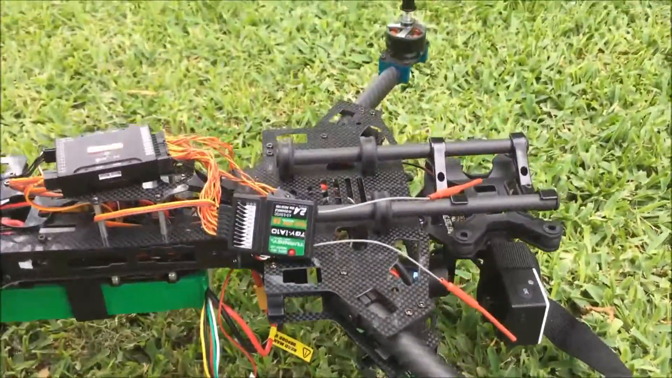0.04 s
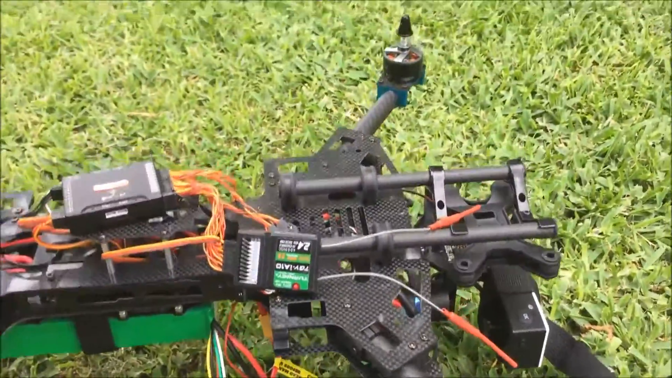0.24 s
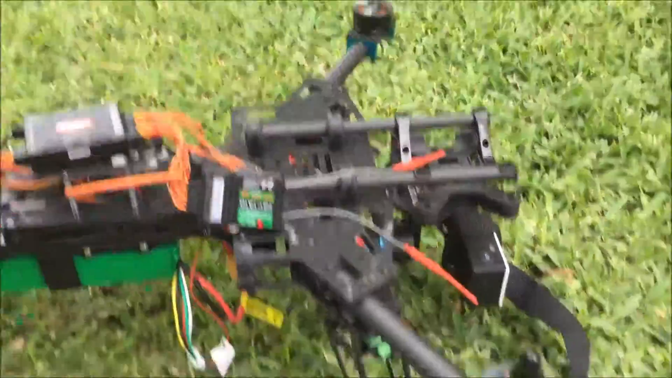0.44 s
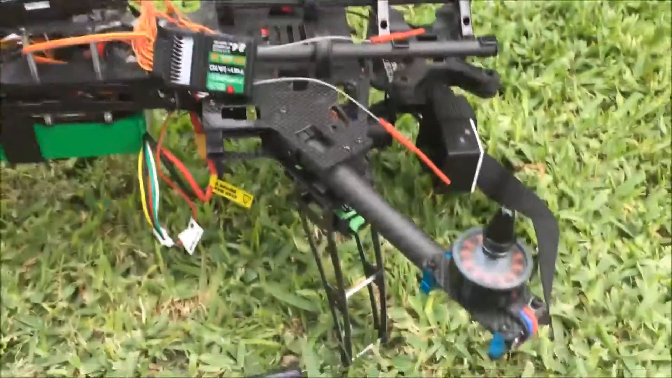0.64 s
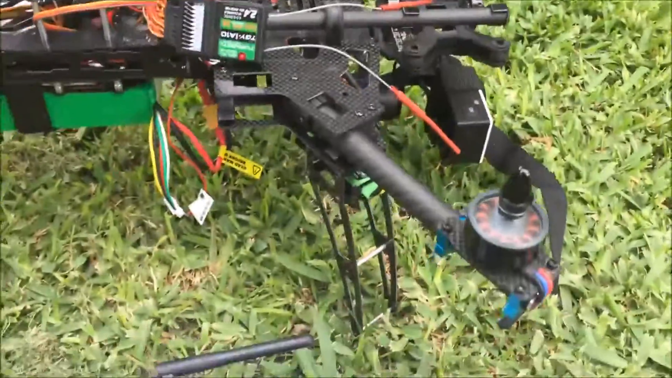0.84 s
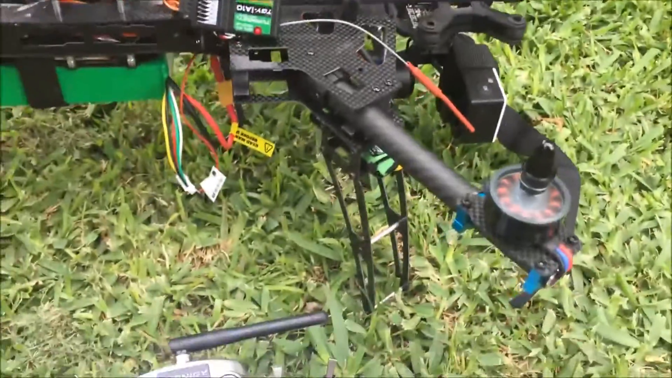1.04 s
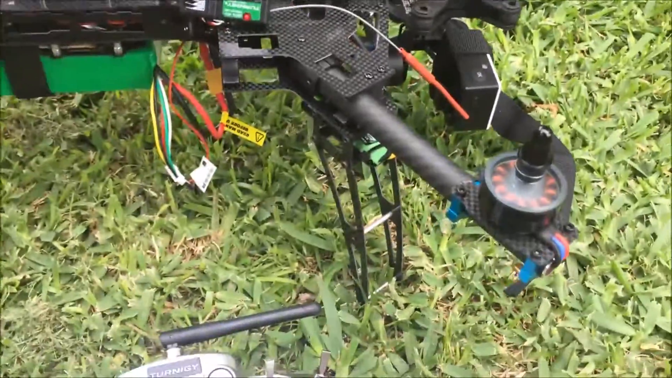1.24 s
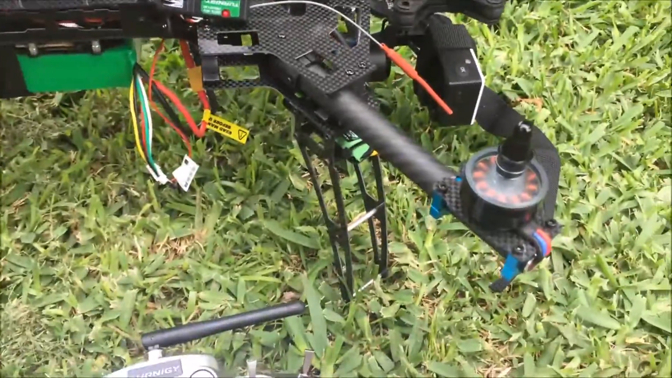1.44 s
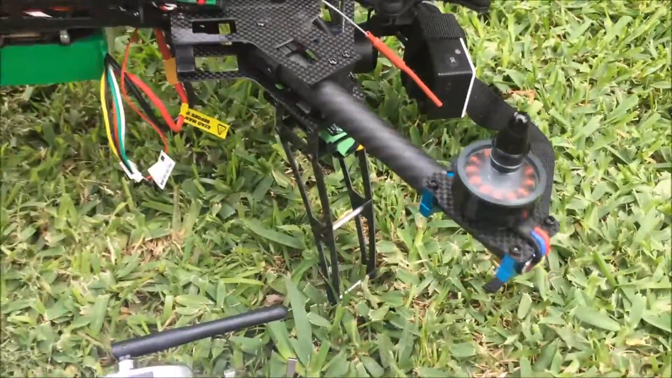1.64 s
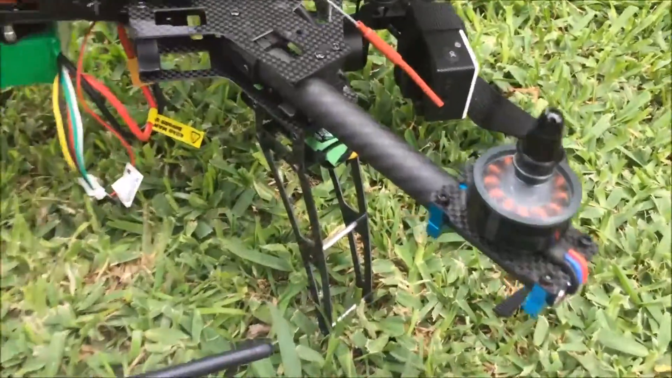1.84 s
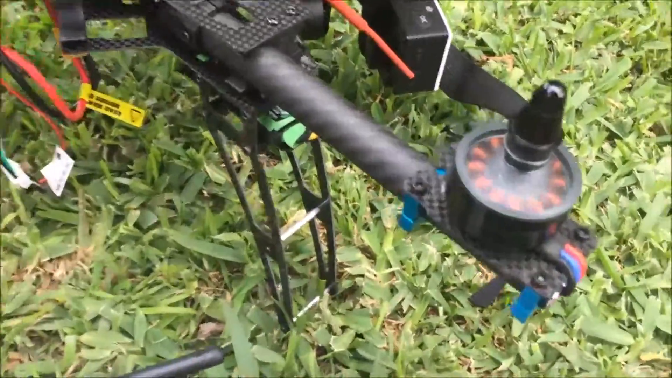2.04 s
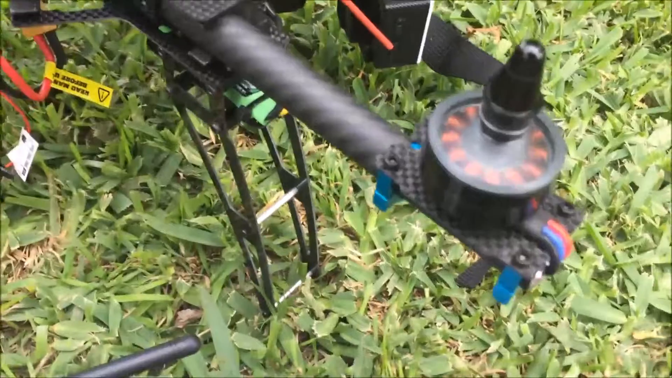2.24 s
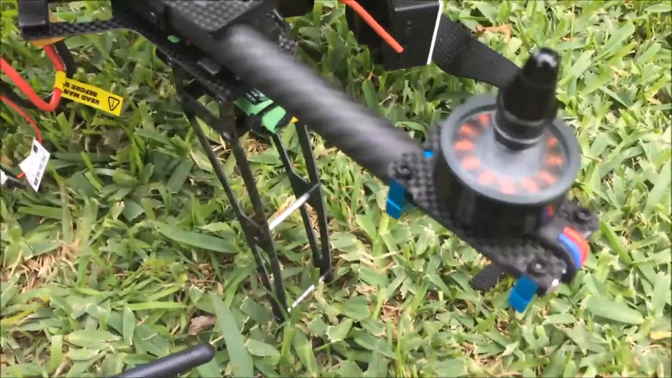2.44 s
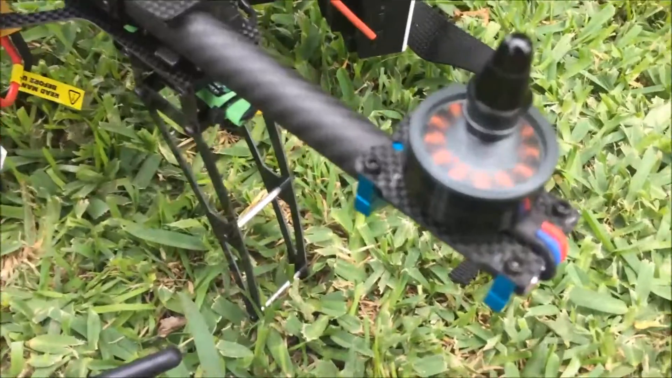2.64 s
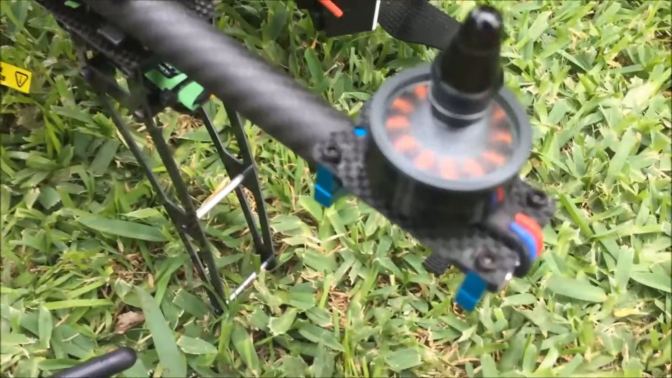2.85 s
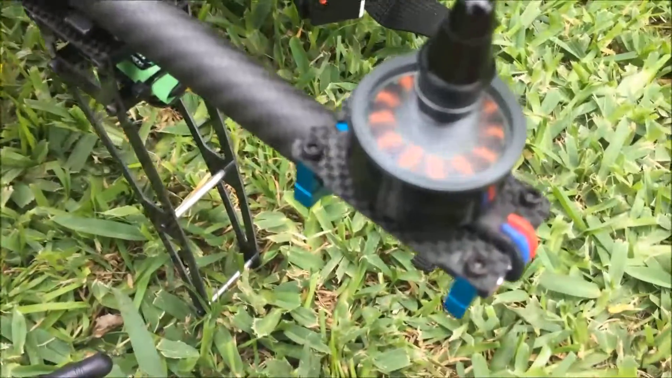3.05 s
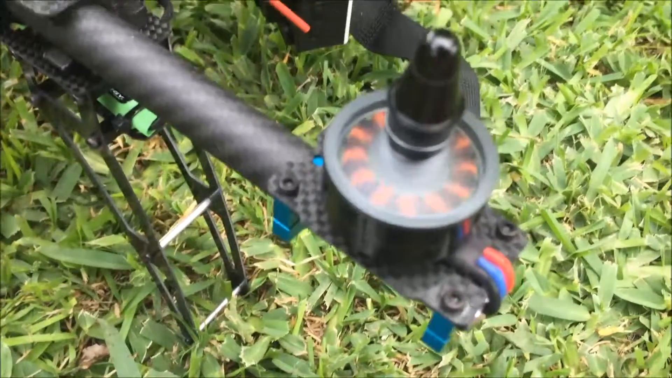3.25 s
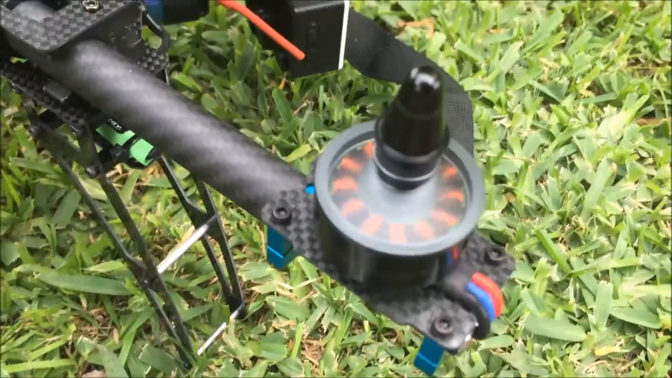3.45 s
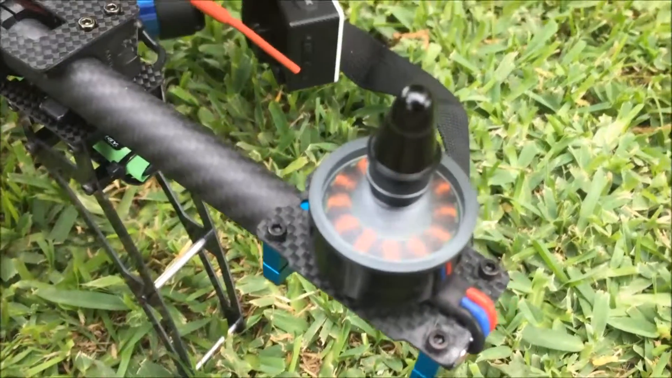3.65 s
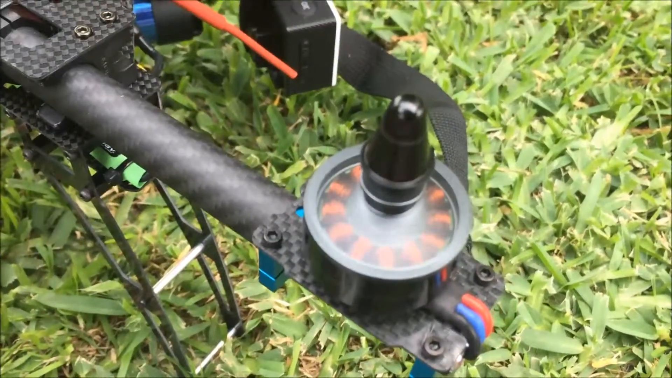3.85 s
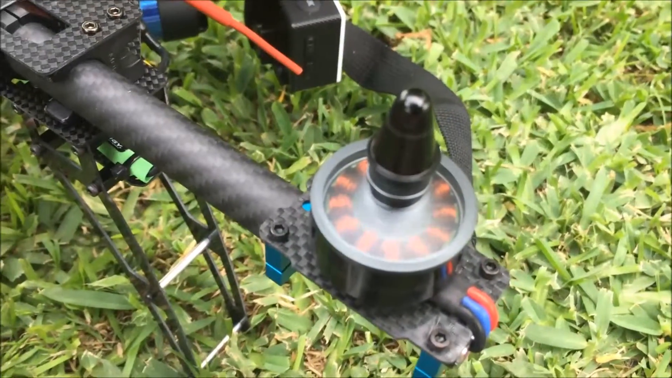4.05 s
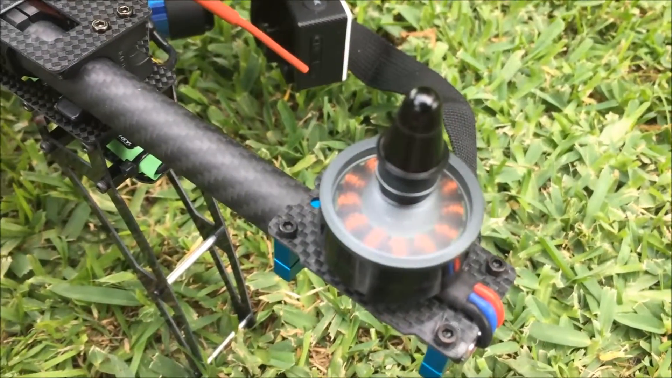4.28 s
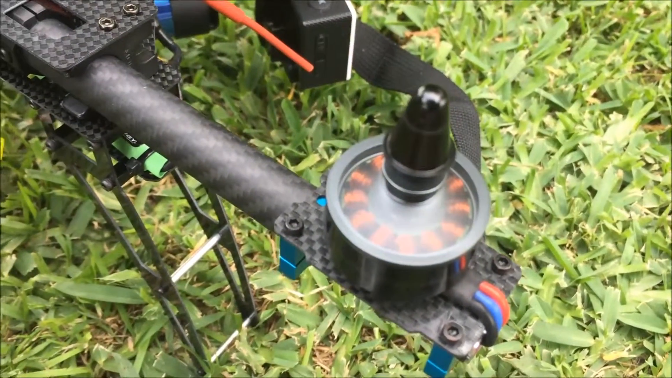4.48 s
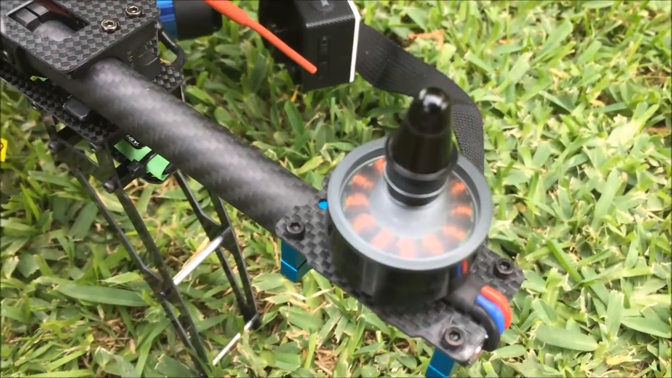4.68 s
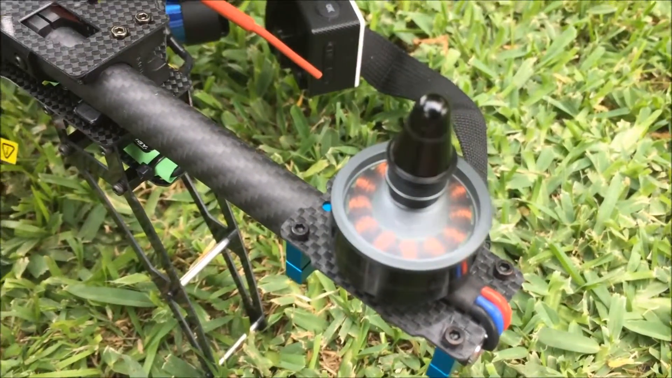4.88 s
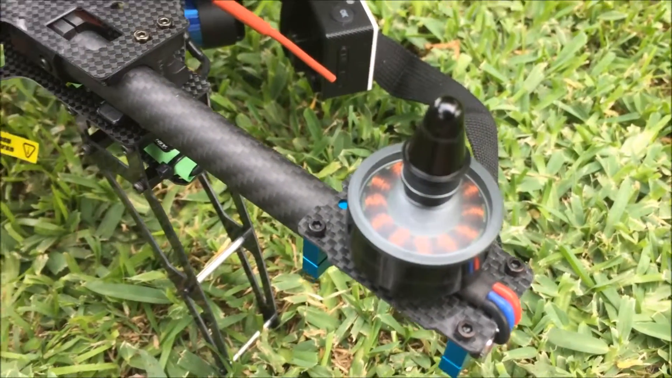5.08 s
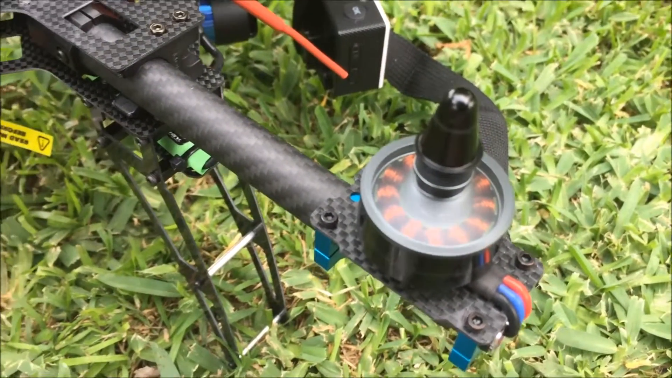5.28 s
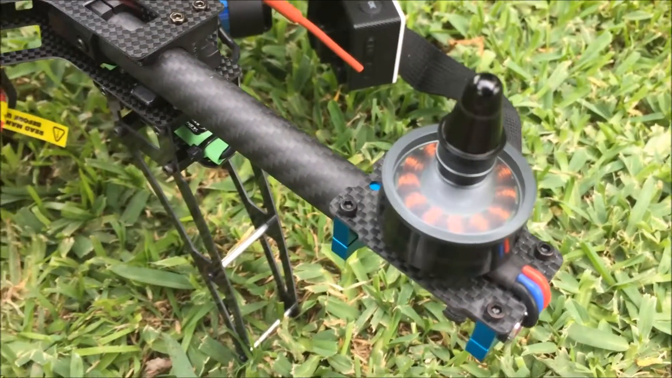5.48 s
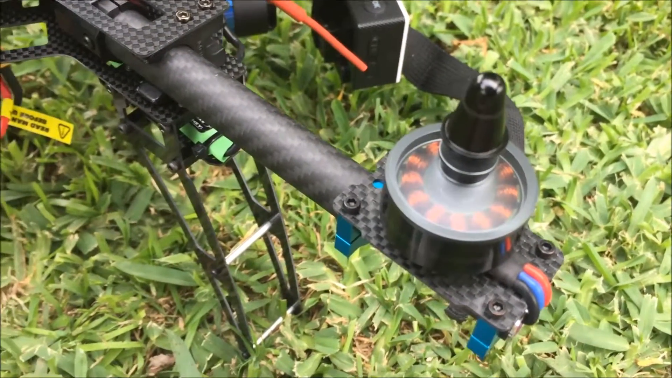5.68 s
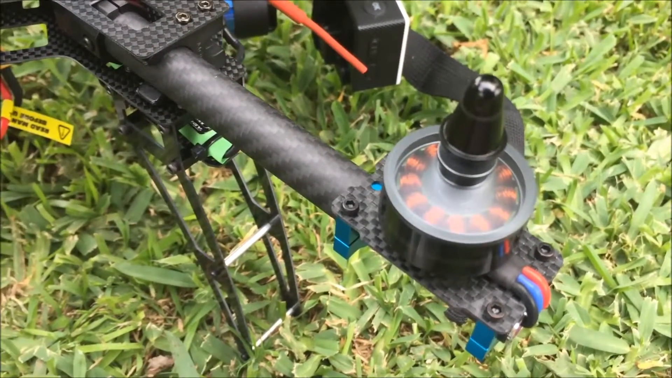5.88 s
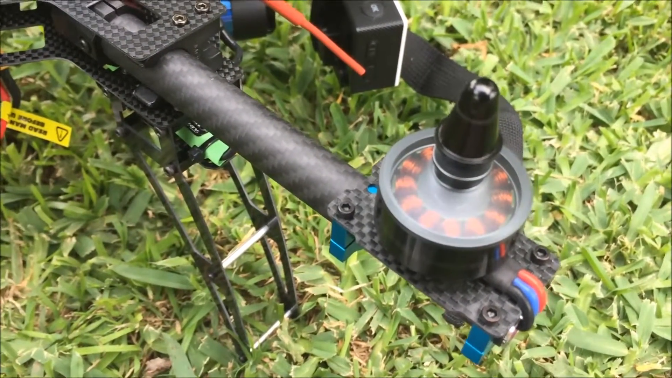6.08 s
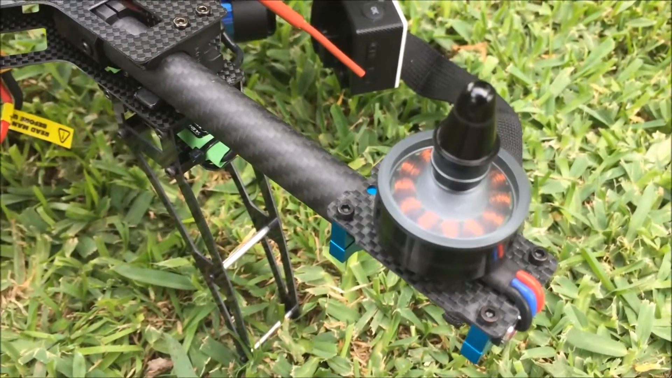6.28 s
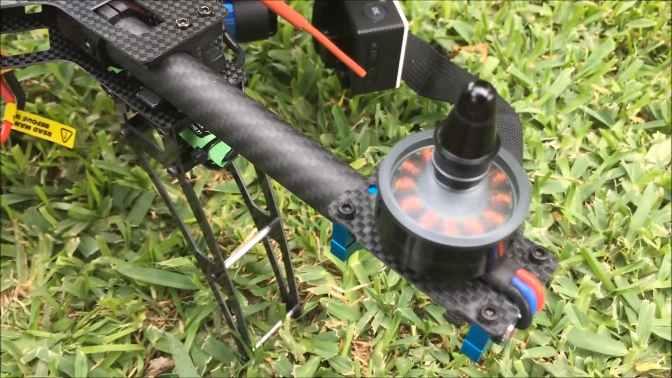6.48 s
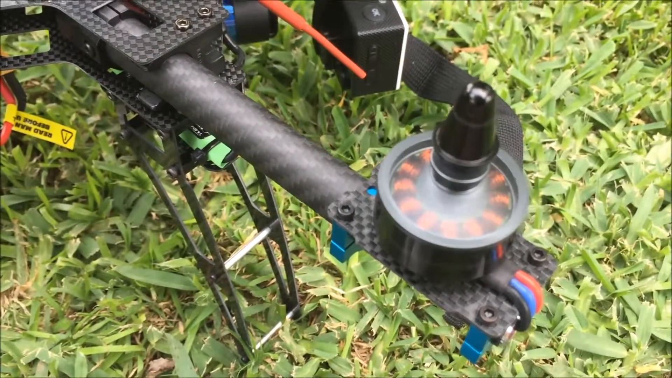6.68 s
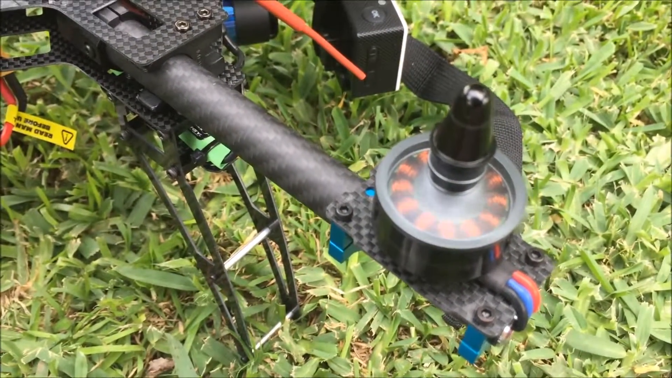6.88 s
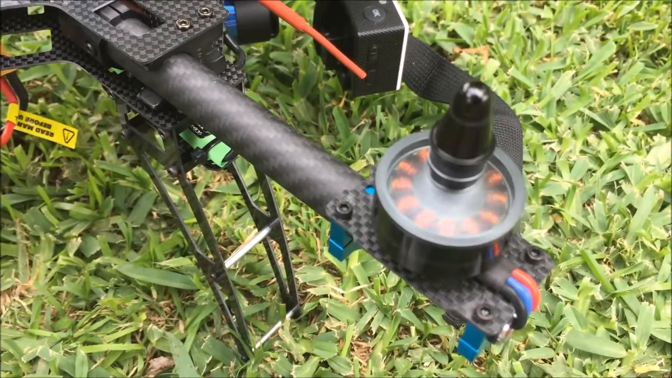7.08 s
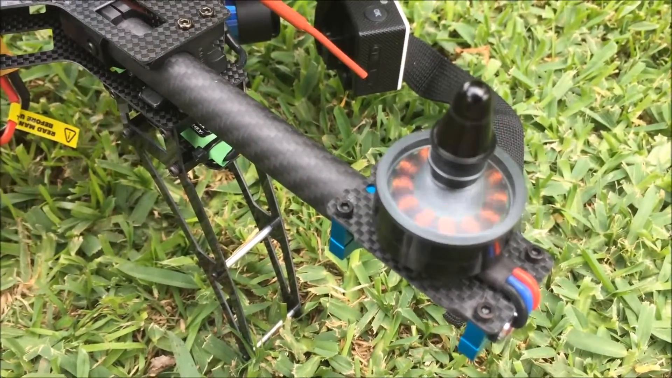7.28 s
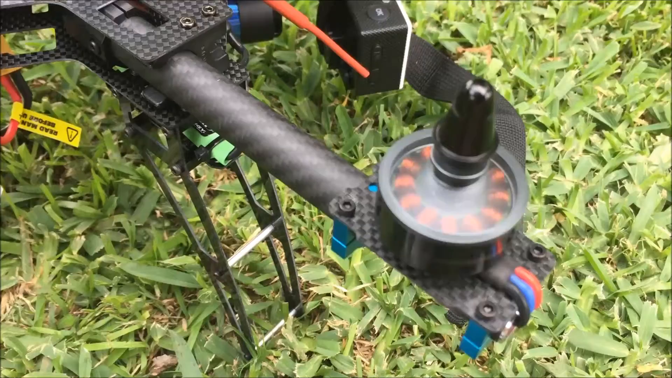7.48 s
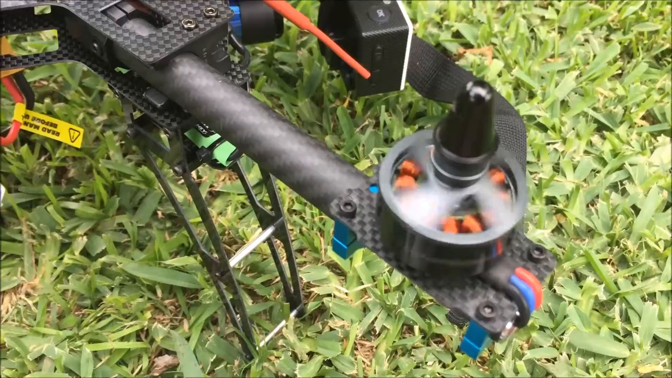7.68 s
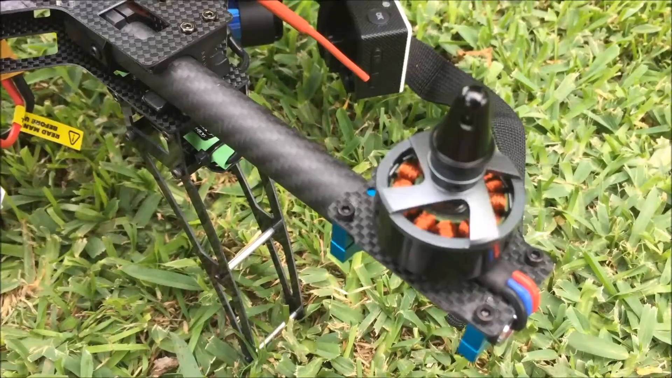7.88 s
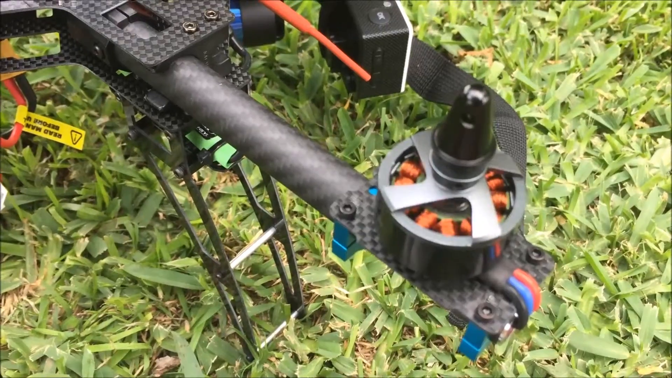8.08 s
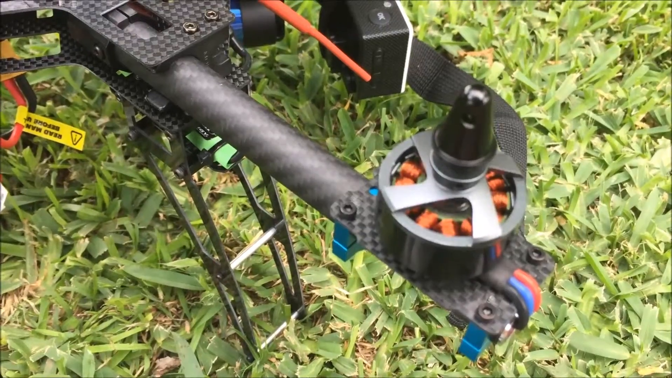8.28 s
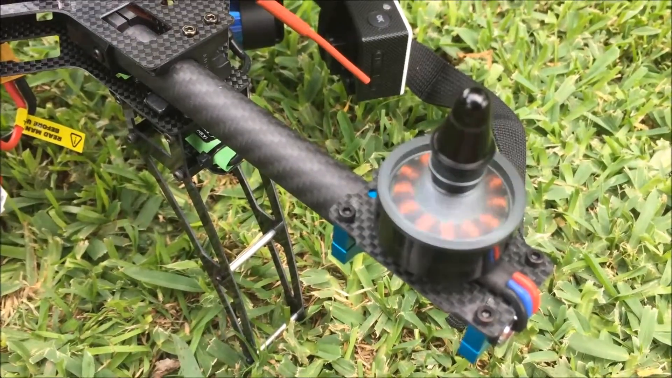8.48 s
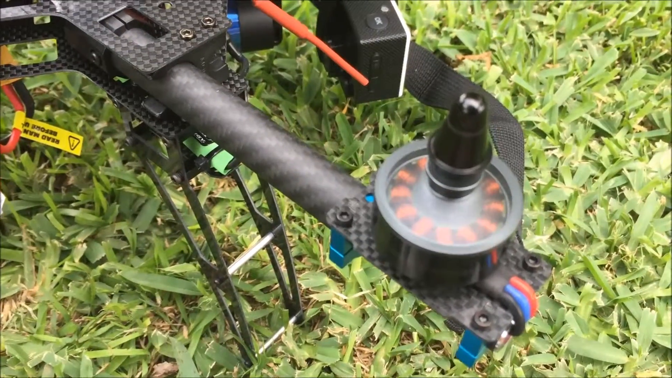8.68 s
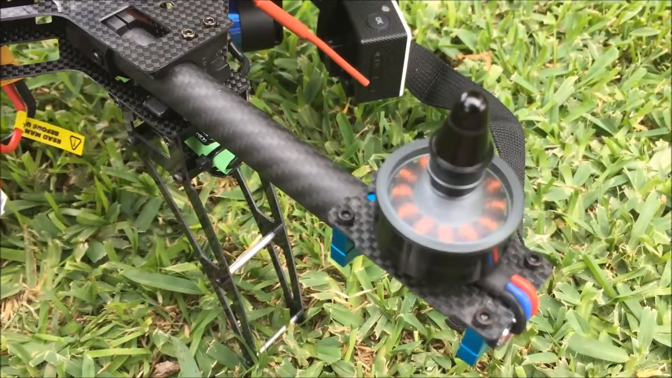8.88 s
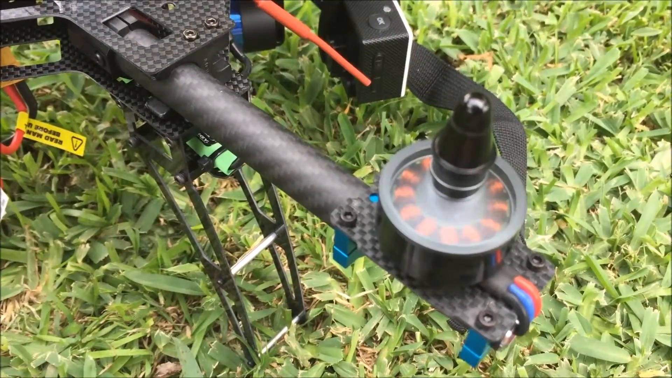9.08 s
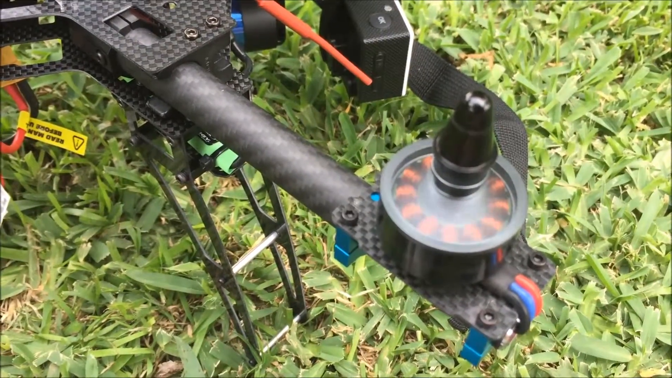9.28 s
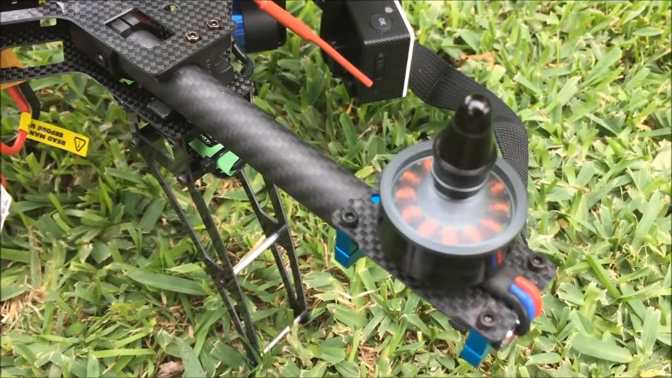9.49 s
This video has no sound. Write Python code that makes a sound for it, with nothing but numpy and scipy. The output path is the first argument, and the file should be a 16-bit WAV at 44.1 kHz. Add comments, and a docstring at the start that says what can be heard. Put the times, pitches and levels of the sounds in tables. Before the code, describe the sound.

Outdoors on grass, close to a small bare brushless motor. From 0 to about 3.8 seconds it runs at steady part throttle: a buzzy, metallic whine with rough bearing hiss, fast ticking rattle and a thin, wavering, very high whistle. It grows slightly nearer and fuller, with momentary dips. From 3.8 to 4.4 seconds the pitch sweeps up, and the whistle vanishes as it reaches a bright, dense full-speed whine, held until 6.5. Then it slows, the whine gliding downward through ringing resonances and thinning into stillness shortly before 8 seconds, leaving faint low rumble, air and a barely audible distant drone. At 8.5 a sharp click and piercing electronic chirp, about a tenth of a second long, kick it into a rapid rising rev with small metallic knocks. Around 8.95 it coasts down again, then picks up at about 9.4 as the sound ends. Dry and close.

```python
"""On a lawn, close to a bare 14-pole, 12-tooth brushless motor on a carbon drone arm.
It runs at part throttle, goes to full, coasts to a stop, restarts with a chirp, coasts again and picks up.
Force waves locked to the rotor make the whine; ticks at the stator teeth and bearing noise make the rattle.
All three pass through the resonances of the motor bell. The controller adds a thin switching whistle.
Knocks of the frame stand out briefly; behind lie a far rumble, still air and a faint distant drone."""
import sys
import numpy as np
from scipy import signal
from scipy.fft import rfft, irfft
from scipy.io import wavfile
from scipy.ndimage import uniform_filter1d

SR = 44100
rng = np.random.default_rng(int(sys.argv[2]) if len(sys.argv) > 2 else 0)


def put_to_file(sound):
    """Save the sound as 16-bit audio at rate SR, in the file named by the first command-line argument."""
    columns = np.atleast_2d(sound).T  # one column per channel
    safe = np.clip(columns, -1, 1)
    whole_steps = np.round(safe * 32767)
    wavfile.write(sys.argv[1], SR, whole_steps.astype(np.int16))


N = 420273
TIME = np.arange(N) / SR
HZ = np.maximum(np.arange(N + 1) * SR / (2 * N), 1)

CUTOFF_HZ = 15700  # nothing is heard above this
CHIRP_S = 8.513  # moment of the restart
# state of the drive; neither full nor coasting is part throttle: (time [s], full throttle [0-1], coasting [0-1])
THROTTLE = [(4.2, 0, 0), (4.38, 1, 0), (6.51, 1, 0), (6.6, 0, .7), (6.9, 0, 1), (8.5, 0, 1), (8.52, 0, 0),
            (8.75, 0, 0), (8.95, 0, 1), (9.38, 0, 1), (9.43, 0, 0)]
# the rotor leans towards three of the teeth; strength of the tick at each: level [dB]
TEETH = [-8, 0, -8, -22, -26, -20, -26, -24, -19, -26, -26, -20]


def from_db(db):
    """Decibels to gain."""
    return 10 ** (np.asarray(db) / 20)


def rms_one(x):
    """Scale to unit power."""
    return x / np.sqrt(np.mean(x ** 2) + 1e-20)


def in_time(rows):
    """Each column of a curve, interpolated at every sample."""
    s, *columns = np.transpose(rows)
    return [np.interp(TIME, s, column) for column in columns]


def colour(points):
    """Gain at every frequency from a short spectrum, interpolated over log frequency."""
    hz, db = np.transpose(points)
    return from_db(np.interp(np.log(HZ), np.log(hz), db))


def resonances(modes):
    """Gain at every frequency of a set of damped modes whose powers add."""
    power = sum(from_db(db) ** 2 / (1 + (2 * (HZ - hz) / width) ** 2) ** 2 for hz, width, db in modes)
    return np.sqrt(power)


def humps_db(rows):
    """Sum of bell-shaped humps in dB at every frequency."""
    return sum(db / (1 + (2 * (HZ - hz) / width) ** 2) for hz, width, db in rows)


def filtered(x, gain):
    """Causal, minimum-phase filter with the given gain, built by folding the cepstrum."""
    cepstrum = irfft(np.log(gain + 1e-7))
    cepstrum[1:N] *= 2
    cepstrum[N + 1:] = 0
    response = np.exp(rfft(cepstrum))
    return irfft(rfft(x, 2 * N) * response)[:N]


def noise(gain):
    """Coloured noise of unit power."""
    spectrum = rfft(rng.standard_normal(2 * N)) * gain
    return rms_one(irfft(spectrum)[:N])


def drift(rate_hz):
    """Random wander of spread 1, twice low-passed at the given rate and computed every 40 samples."""
    step, settle = 40, 2000
    r = np.exp(-2 * np.pi * step * rate_hz / SR)
    chance = rng.standard_normal(N // step + settle + 2)
    slow = signal.lfilter([1], [1, -2 * r, r * r], chance)[settle:]
    return np.interp(np.arange(N) / step, np.arange(len(slow)), rms_one(slow))


def sine(cycles):
    """Sine of unit power with a random starting phase."""
    return np.sqrt(2) * np.sin(2 * np.pi * (cycles + rng.random()))


def rotor_rpm():
    """The rotor follows the controller under power; dry friction and drag slow it in between."""
    # rotor speed in each spell under power: (time [s], speed [turns per minute])
    long_run = [(0, 6594), (.15, 6780), (.4, 6888), (1.1, 6926), (3, 6884), (3.86, 6884), (4, 7740),
                (4.1, 8640), (4.2, 9324), (4.3, 9840), (4.385, 10644), (6.51, 10644), (6.57, 10320),
                (6.7, 9912), (6.81, 9400), (6.9, 8526)]
    restart = [(8.5, 0), (8.54, 1680), (8.62, 4248), (8.69, 7250), (8.8, 8800), (8.88, 9160), (8.94, 9050),
               (9, 8490)]
    pick_up = [(9.4, 4560), (9.45, 5070), (9.53, 6430)]
    friction_rpm_per_s, drag_per_s, inertia_s = 4400, .89, .03
    offset = friction_rpm_per_s / drag_per_s
    rpm = np.zeros(N)
    for spell in (long_run, restart, pick_up):
        start, (end, last_rpm) = spell[0][0], spell[-1]
        coasting = (last_rpm + offset) * np.exp(-drag_per_s * (TIME - end)) - offset
        after_start = np.where(TIME < end, in_time(spell)[0], coasting)
        rpm = np.where(TIME < start, rpm, after_start)
    # inertia rounds the corners
    return uniform_filter1d(np.maximum(rpm, 0), int(inertia_s * SR), mode="nearest")


def motor(rpm, speed, turns):
    """Hiss, ticks, whine and stirred air follow the rotor speed and how fast it changes."""
    # level by speed: (speed [turns per minute], bearing hiss [dB], tooth ticking [dB], magnetic whine [dB])
    loudness = [(1280, -85, -105, -77), (2250, -59.5, -57.5, -54.5), (4560, -42, -42.5, -48),
                (7070, -37.5, -36, -42.5), (8870, -34.5, -34.5, -39), (10644, -35.5, -39, -43.5)]
    # the listener steps up to the motor: (time [s], rattle level [dB], whine level [dB])
    approach = [(0, -1, -4), (.5, -2.5, -5), (1.3, -2, -2), (1.9, -1.5, -3), (2.3, 0, 0.5), (3.3, -.5, 0),
                (4.4, 2.5, 0.5)]
    # the ticking builds up over the first seconds: (time [s], level [dB])
    tick_build = [(0, -14), (.5, -6), (1.2, 1), (2.3, 3), (3.3, 4)]
    # narrow modes that the ticks also ring in during a sweep: (frequency [Hz], width [Hz], level [dB])
    tick_rings = [(3100, 200, -7), (5820, 297, -2), (7200, 360, -8), (12050, 620, -3), (12500, 890, -8)]
    bell = bell_response()
    at_rpm, *columns = np.transpose(loudness)
    hiss_law, tick_law, whine_law = [np.interp(rpm, at_rpm, column) for column in columns]
    near_rattle, near_whine = in_time(approach)

    # 0 at steady speed, 1 in a fast sweep
    rpm_per_s, full_sweep_rpm_per_s = np.gradient(rpm) * SR, 3500
    sweeping = uniform_filter1d(np.minimum(np.abs(rpm_per_s) / full_sweep_rpm_per_s, 1), size=SR // 12)

    # the hard pull from standstill grinds the bearing
    pull_db, full_pull_rpm_per_s = -43, 45000
    pull = from_db(pull_db) * np.clip(rpm_per_s / full_pull_rpm_per_s, 0, 1) ** 2 * (TIME > CHIRP_S)
    # in a sweep hiss and ticks soften, and the ticks grow uneven
    hiss = from_db(hiss_law - .8 * sweeping) + pull
    tick_change_db = sweeping * (-2.2 + .8 * drift(11))
    tick_level = from_db(tick_law - 2 + in_time(tick_build)[0] + tick_change_db)
    ticking = tick_level * tooth_ticks(turns, bell)
    ringing = from_db(3.5) * filtered(sweeping * ticking, resonances(tick_rings))

    rattle = hiss * bearing_hiss(speed, bell) + ticking + ringing
    tones = from_db(whine_law + near_whine) * whine(speed, turns, bell, sweeping)
    return dips() * (from_db(near_rattle) * rattle + flutter(rpm)) + tones + windage(rpm)


def bell_response():
    """Resonances of bell and arm, with dead spots where neighbouring modes cancel."""
    # resonances: (frequency [Hz], width [Hz], level [dB])
    bell_modes = [(697, 180, -8.5), (985, 420, -12.5), (1520, 620, -7.5), (1912, 826, -1), (2440, 550, -5),
                  (3108, 620, -4), (3660, 530, -9.5), (4280, 1170, -4.5), (5780, 350, 0), (6860, 2030, 1.5),
                  (7730, 450, 0.5), (8390, 4200, -0.5), (11440, 740, 3), (12090, 820, 7.5),
                  (13110, 770, 11.5), (14040, 690, 12)]
    # dead spots: (frequency [Hz], width [Hz], depth [dB])
    dead_spots = [(4970, 280, 7.5), (2740, 390, 2), (6360, 280, 3.5), (8980, 210, 6)]
    return resonances(bell_modes) * from_db(-humps_db(dead_spots))


def whine(speed, turns, bell, sweeping):
    """Magnetic force waves locked to the rotor swell as they sweep through the bell's resonances."""
    # force waves: (multiple of rotor speed, used rounded [1], part throttle [dB], full [dB], coasting [dB])
    forces = [(12, -14.5, -20.5, -6), (13, 4, 2, 6), (14, -7, 6.5, -0.5), (21, -7, 9.5, -11),
              (28, 4.5, 1, 3.5), (33, -32, -8, -22.5), (36, 5, -3, 2), (37, -13, -4.5, -7.5),
              (42, -9, 6.5, -15.5), (48, -1.5, -17, 0.5), (49, -14, -13, -11), (60, -15, -2.5, -5.5),
              (68.4, -30.5, -6.5, -23), (70, -20, -8.5, -20), (70.96, -17.5, -0.5, -18.5),
              (72, -10.5, -1.5, -4.5), (72.5, -17.5, -12, -14), (73.7, -20, -13, -15),
              (75, -8.5, -7.5, -24)]
    # rings where a sweeping tone flares and gaps where it fades: (frequency [Hz], width [Hz], lift [dB])
    flares = [(2093, 890, 3), (3100, 220, 5), (3650, 300, -4), (4300, 450, 5), (5250, 450, -12),
              (5910, 390, 10), (6500, 300, -4), (7000, 670, 4), (11850, 630, 7)]
    # the lowest strong tone fades and returns as the listener moves: (time [s], level [dB])
    low_tone = [(0, 3), (1, -1), (2, -2.5), (2.3, -4.5), (3.1, -3), (3.6, 3.5), (4.1, 2.5), (4.4, 0)]
    low_tone_multiple = 13
    full, coast = in_time(THROTTLE)
    part = 1 - full - coast
    sweep_db = humps_db(flares) - 3  # in a sweep all tones drop 3 dB, apart from the flares
    low_tone_db = in_time(low_tone)[0]
    waver_db = .96 + .7 * sweeping
    out = 0
    for multiple, part_db, full_db, coast_db in forces:
        k = round(multiple)
        hz = k * speed
        force_db = part * part_db + full * full_db + coast * coast_db
        force_db = force_db + waver_db * drift(10)
        force_db = force_db + (k == low_tone_multiple) * low_tone_db
        force_db = force_db + sweeping * np.interp(hz, HZ, sweep_db)
        level = from_db(force_db) * np.interp(hz, HZ, bell) * (hz < CUTOFF_HZ)
        out = out + level * sine(k * turns)
    return out


def tooth_ticks(turns, bell):
    """The rotor ticks at the stator teeth in much the same pattern every turn; each tick rings in the bell."""
    # colour of the ticks ahead of the bell: (frequency [Hz], level [dB])
    tick_colour = [(300, -26.5), (1500, -15.5), (3000, -3), (5000, -5.5), (7000, -2), (9000, -1.5),
                   (12000, 3), (14000, -5.5), (15200, 22), (16000, -6.5)]
    spacing_error = .002  # in tooth spacings, the same every turn
    jitter_s, ring_s, rough_db = 5e-7, .0035, .7
    count = len(TEETH)
    tick = np.arange(1, int(turns[-1] * count))
    tooth = tick % count
    offset = rng.standard_normal(count)
    late, chance = rng.standard_normal((len(tick), 2)).T
    angle = (tick + spacing_error * offset[tooth]) / count
    at = np.interp(angle, turns, np.arange(N)) + jitter_s * SR * late
    strength = from_db(np.array(TEETH)[tooth] + rough_db * chance)

    # each click is a short sinc, so that it can fall between samples
    taps = at.astype(int)[:, None] + np.arange(-7, 9)
    shape = strength[:, None] * np.sinc(taps - at[:, None])
    clicks = np.bincount(np.clip(taps, 0, N - 1).ravel(), shape.ravel(), N)
    burst = SR // 50
    ring = rng.standard_normal(burst) * np.exp(-TIME[:burst] / ring_s)
    ticks = rms_one(filtered(signal.fftconvolve(clicks, ring)[:N], bell * colour(tick_colour)))
    # evened out to a steady loudness
    power = uniform_filter1d(ticks ** 2, SR // 12)
    return ticks / np.sqrt(np.abs(power) + 1e-3)


def bearing_hiss(speed, bell):
    """Rolling noise; when coasting it repeats from tooth to tooth, which draws gliding bands."""
    # colour of the rolling noise ahead of the bell: (frequency [Hz], level [dB])
    hiss_colour = [(200, -20.5), (500, -10), (1000, -12.5), (2000, 2), (3200, -2.5), (4500, -1.5),
                   (5800, -6.5), (7000, -5.5), (8500, -12.5), (10500, -9), (12500, -13), (16000, -12.5)]
    roll = noise(bell * colour(hiss_colour))
    repeat = .7 * in_time(THROTTLE)[-1]
    lag = np.round(SR / (len(TEETH) * np.maximum(speed, 10))).astype(int)
    earlier = np.maximum(np.arange(N) - lag, 0)
    treble = filtered(roll, colour([(1800, -30), (3500, 0)]))  # only the treble repeats
    once = treble[earlier]
    twice = once[earlier]
    banded = roll + repeat * (once + .6 * twice)
    grain = from_db(drift(60))  # wavers by about 1 dB
    return grain * banded / np.sqrt(1 + 2 * repeat ** 2)


def flutter(rpm):
    """At part throttle the bearing flutters in one narrow mode of the bell."""
    hz, width_hz, level_db, depth_db = 2054, 330, -47, 2.0
    full, coast = in_time(THROTTLE)
    cruising = (1 - full - coast) * np.interp(rpm, [5500, 6600], [0, 1])
    level = from_db(level_db + depth_db * drift(25))
    return cruising * level * noise(resonances([(hz, width_hz, 0)]))


def dips():
    """Gain of the rattle and flutter, whose level dips for an instant now and then."""
    # brief dips: (time of the middle [s], depth [dB])
    dip_rows = [(.06, 5), (1.11, 4), (1.25, 3), (1.3, 5), (1.45, 6), (1.89, 6), (2.02, 2), (2.063, 5),
                (2.19, 5), (3.48, 6), (4.005, 7.5), (4.18, 9), (4.24, 10), (5.22, 7), (5.26, 13),
                (6.775, 5.5), (6.885, 3.5), (7.15, 8), (7.619, 17), (8.655, 20), (9.02, 2), (9.125, 4.5),
                (9.21, 3)]
    dip_s = .026  # width at half depth
    edges = dip_s * np.array([-.7, -.3, .3, .7])
    depth_db = sum(db * np.interp(TIME - s, edges, [0, 1, 1, 0]) for s, db in dip_rows)
    return from_db(-depth_db)


def windage(rpm):
    """Air stirred by the spinning bell: noise that rises very steeply with speed."""
    # colour of the stirred air: (frequency [Hz], level [dB])
    air_colour = [(200, -7.5), (400, -10), (700, -3.5), (1200, 1), (1800, -13), (4000, -17)]
    top_speed_db, power = -53, 12
    return from_db(top_speed_db) * (rpm / rpm.max()) ** power * noise(colour(air_colour))


def switching(turns, partials, flutter_cycles, waver_db):
    """The controller's carriers, with sidebands shifted by multiples of the rotor speed."""
    out = 0
    for hz, multiple, db in partials:
        level = from_db(db + waver_db * drift(25))
        cycles = hz * TIME + round(multiple) * turns + flutter_cycles * drift(60)
        out = out + level * sine(cycles)
    return out


def whistle(rpm, turns):
    """The controller chops the current, and so whistles, only at part throttle."""
    # course of the whistle: (time [s], level before the 1 dB lift below [dB])
    whistle_course = [(0.0, -35), (0.1, -32), (0.65, -39.5), (0.78, -31), (1.03, -31.5), (1.18, -38.5),
                      (1.3, -33), (1.48, -38), (1.95, -34.5), (2.02, -28.5), (2.1, -39), (2.28, -29),
                      (2.65, -39), (2.89, -27), (3.19, -27.5), (3.8, -32.5), (3.88, -28.5), (4.2, -33)]
    # its partials: (carrier [Hz], offset [multiples of rotor speed], level [dB])
    sidebands = [(14826, -14, -4), (14826, -10, -4), (14826, -16, -21), (14826, 0, -17), (7613, 0, -19)]
    full, coast = in_time(THROTTLE)
    running = np.interp(rpm, [4200, 5500], [0, 1])
    restarted_db = -.5 * (TIME > CHIRP_S)  # weaker after the restart
    level = from_db(in_time(whistle_course)[0] + 1 + restarted_db)
    tones = switching(turns, sidebands, flutter_cycles=.067, waver_db=.9)
    return running * (1 - full - coast) ** 2 * level * tones


def chirp(turns):
    """A burst of slow switching kicks the rotor from standstill: it sags, holds, stops and rings on faintly."""
    # its partials: (carrier [Hz], offset [multiples of rotor speed], level [dB])
    chirp_partials = [(7612, 0, -1.5), (7670, 14, -27), (7600, -14, -30), (15000, 0, -25)]
    attack_s, length_s, release_s = .009, .11, .005
    first_db, held_db, sag_db_per_s = -11, -16.5, 90
    ring_db, ring_s = -36, .15
    age = np.maximum(TIME - CHIRP_S, 0)
    attack = np.minimum(age / attack_s, 1)
    release = np.clip(1 - (age - length_s) / release_s, 0, 1)
    burst = from_db(np.maximum(first_db - sag_db_per_s * age, held_db))
    ring = from_db(ring_db) * np.exp(-age / ring_s)
    tones = switching(turns, chirp_partials, flutter_cycles=.01, waver_db=.5)
    return attack * (release * burst + ring) * tones


def knocks():
    """Jolts set frame and bell ringing briefly: decaying bursts of narrow-band noise."""
    # knocks and rings: (time [s], level at the onset [dB], ring [Hz], width [Hz], decay [s])
    jolts = [(4.64, -47, 706, 200, 0.027), (6.92, -41, 1000, 300, 0.02), (6.92, -52, 593, 200, 0.018),
             (7.66, -53, 2130, 600, .05), (8.513, -58, 2000, 900, .012), (8.511, -28.5, 6600, 2500, 0.0081),
             (8.515, -35.5, 5960, 300, 0.11), (8.515, -42, 3200, 250, 0.16), (8.643, -32, 4080, 200, 0.018),
             (8.67, -38, 3100, 200, 0.021), (9.01, -43.5, 1040, 119, 0.019)]
    out = 0
    for s, db, hz, width, decay_s in jolts:
        decay = (TIME > s) * np.exp(-np.abs(TIME - s) / decay_s)
        out = out + from_db(db) * decay * noise(resonances([(hz, width, 0)]))
    return out


def outdoors():
    """Far rumble that swells at random, still air, and a distant drone heard as a narrow band of noise."""
    # colour of the still air: (frequency [Hz], level [dB])
    still_air = [(40, -6), (150, -1), (300, -9.5), (450, -22), (700, -14.5), (1100, -23), (1600, -20),
                 (3000, -29), (7000, -33.5), (16000, -43)]
    # colour of the far rumble: (frequency [Hz], level [dB])
    rumble_colour = [(20, -40), (35, -30), (55, 2), (80, 2.5), (120, 3.5), (180, -1.5), (260, -16),
                     (380, -41.5), (700, -54.5), (1200, -38), (3000, -54)]
    # course of the far rumble: (time [s], level before the 0.5 dB cut below [dB])
    rumble_course = [(0.0, -46), (1.4, -50.5), (2.78, -49), (3.65, -50.5), (9.42, -56), (9.5, -53)]
    # the distant drone comes and goes: (time [s], level [dB])
    drone_course = [(0, -104), (4, -65), (6.5, -68), (7.2, -57.5), (8.2, -66), (9.5, -58.5)]
    air_db, swell_db, drone_hz, drone_width_hz = -61, 2.56, 1020, 130
    rumble_level = from_db(in_time(rumble_course)[0] - .5 + swell_db * drift(3.5))
    rumble = rumble_level * noise(colour(rumble_colour))
    air = from_db(air_db) * noise(colour(still_air))
    drone = from_db(in_time(drone_course)[0]) * noise(resonances([(drone_hz, drone_width_hz, 0)]))
    return rumble + air + drone


def scene():
    """One rotor angle drives whine, ticks, whistle and chirp; both channels are alike."""
    rpm = rotor_rpm()
    speed = rpm / 60 * (1 + .0002 * drift(5))  # turns per second, slightly unsteady
    turns = np.cumsum(speed) / SR
    close = motor(rpm, speed, turns) + whistle(rpm, turns) + chirp(turns) + knocks()
    return np.tile(close + outdoors(), (2, 1))


def record(dry):
    """The microphone signal is cut steeply at the top by an elliptic low-pass."""
    return signal.sosfilt(signal.ellip(12, .1, 90, CUTOFF_HZ, fs=SR, output="sos"), dry)


dry = scene()
out = record(dry)
put_to_file(out)
```